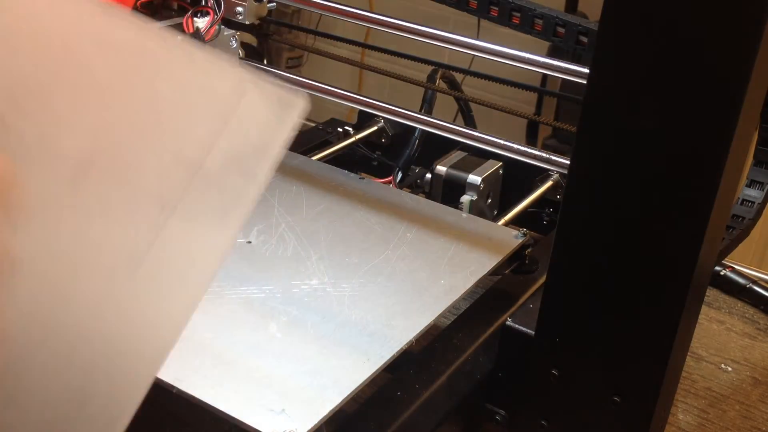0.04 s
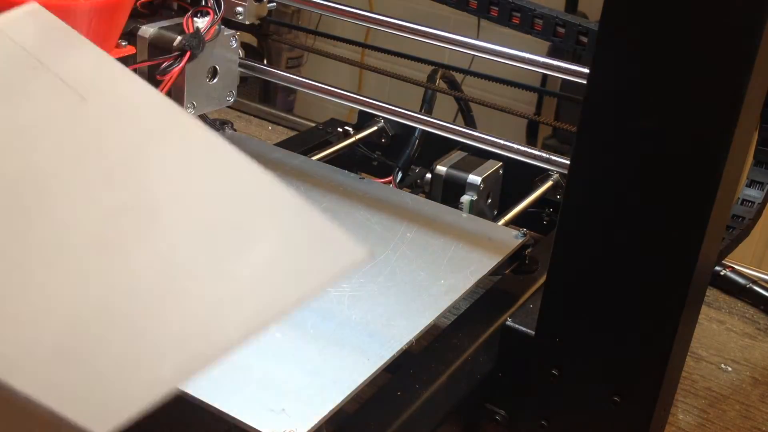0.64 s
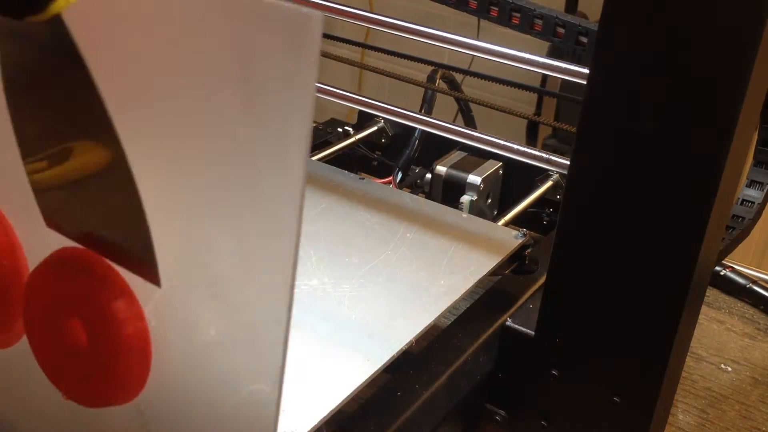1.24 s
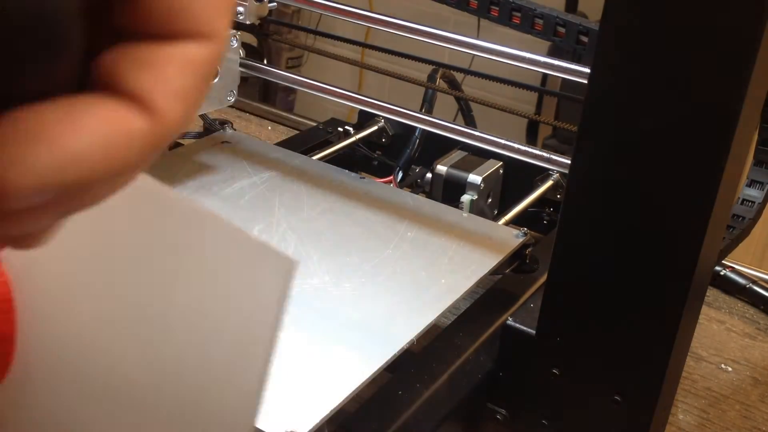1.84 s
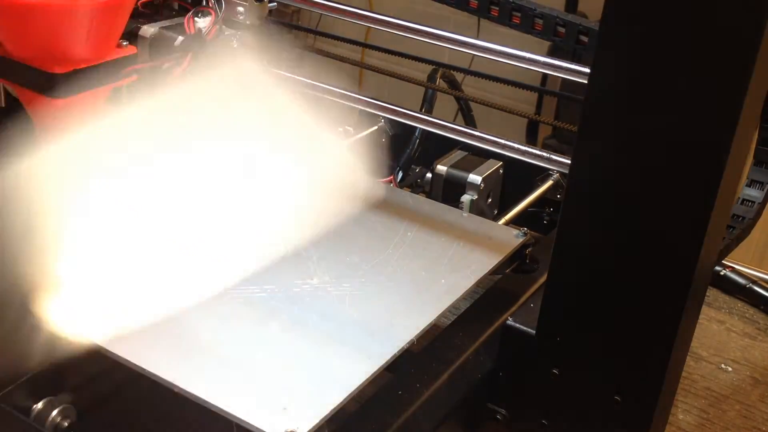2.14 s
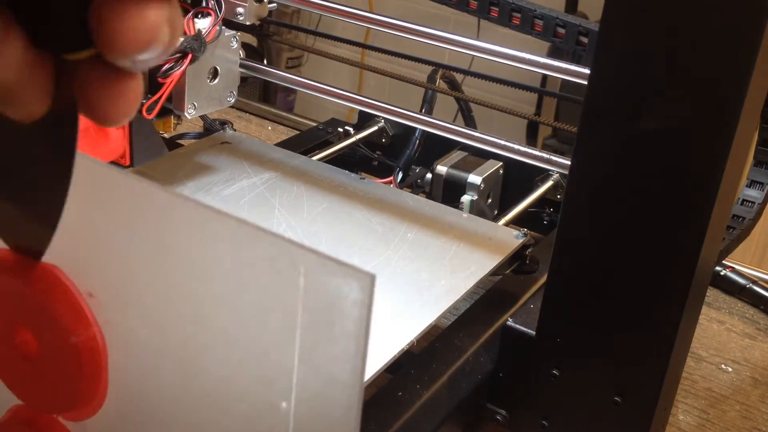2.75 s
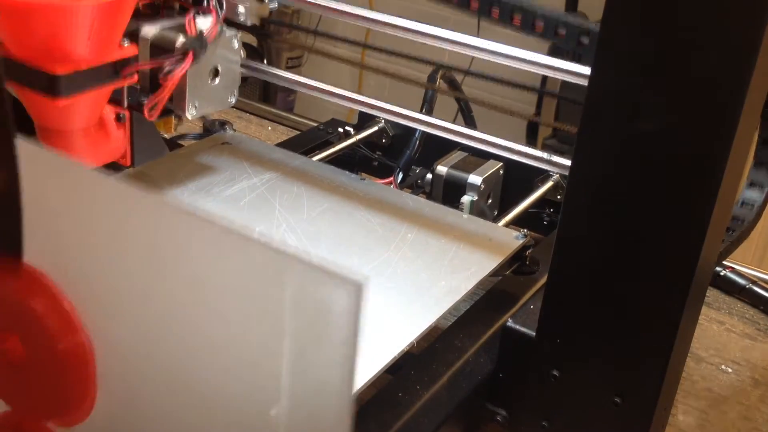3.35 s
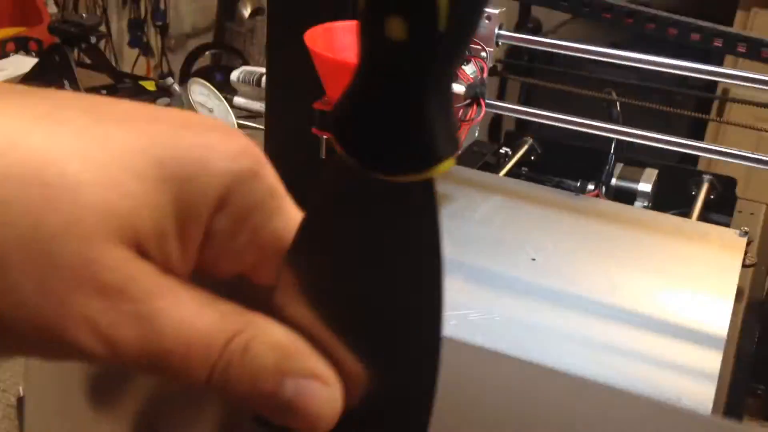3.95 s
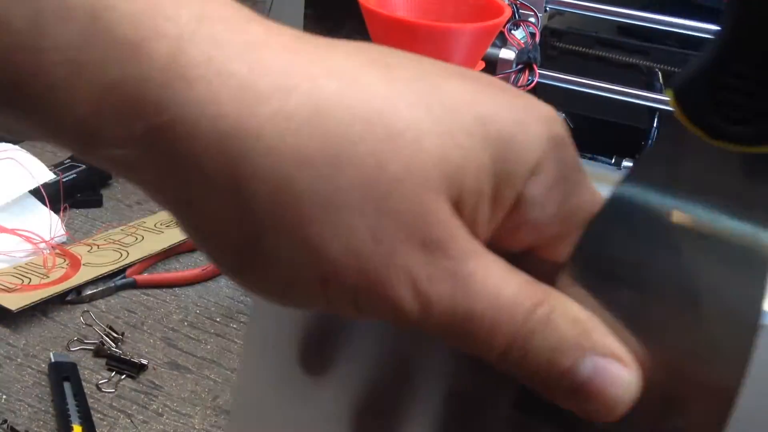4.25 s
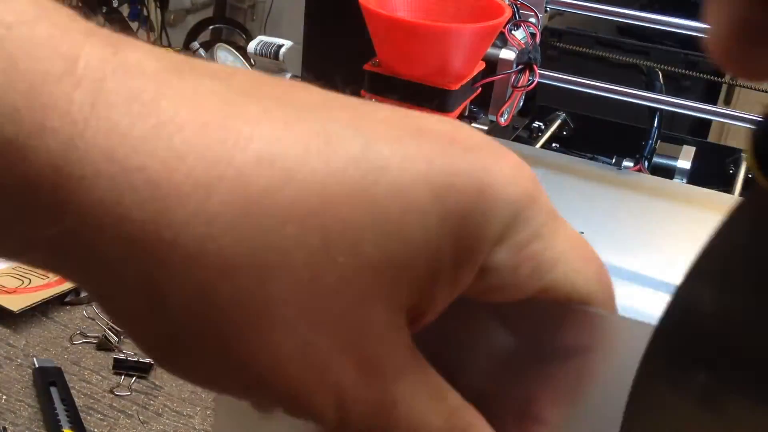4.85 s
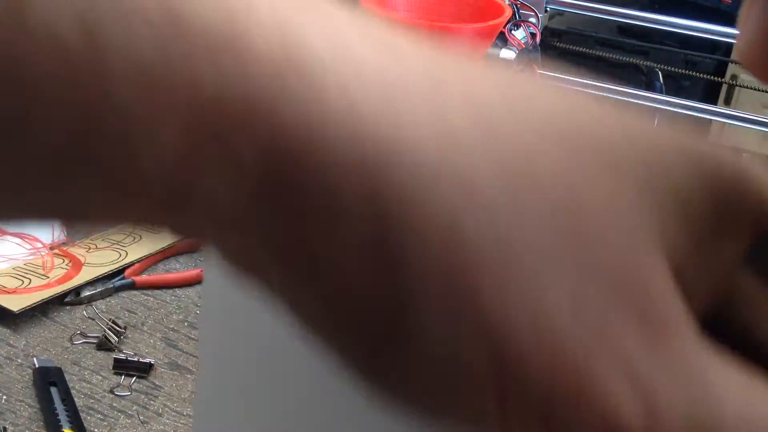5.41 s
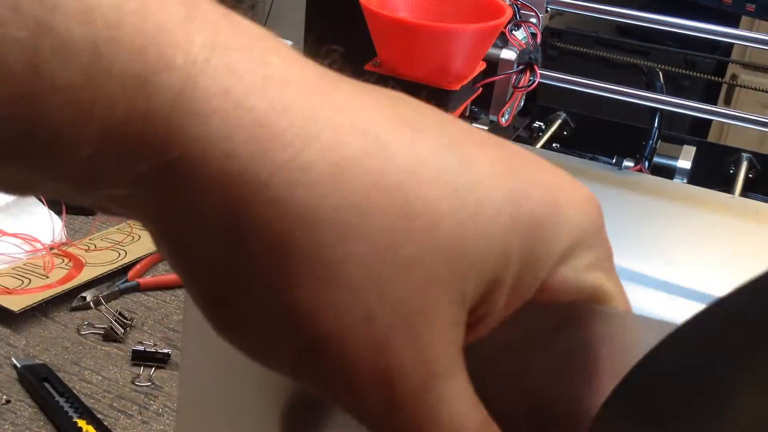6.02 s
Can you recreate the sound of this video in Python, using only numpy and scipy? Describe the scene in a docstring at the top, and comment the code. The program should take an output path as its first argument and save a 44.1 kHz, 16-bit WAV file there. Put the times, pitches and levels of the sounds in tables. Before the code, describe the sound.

An idling 3D printer's fans hiss quietly throughout, with a thin high whine, in a small room. Close up, a stiff plastic sheet is handled, with a faint tick at the start and light taps around 1 second. At about 1.5 seconds it clacks sharply three times against a steel scraper. Smaller taps and dry crackles follow, then a loud cluster of clacks near 2.5 seconds, a few ticks at 3.1 and another sharp double clack at 3.4. Around 4 seconds the fan hiss changes colour slightly, amid soft dull knocks and faint finger rubbing. From 4.5 to 4.7 seconds a printed piece stuck to the flexing sheet lets go in a quick run of about six bright, briefly ringing snaps. Light crackling and rubbing follow, then a second run of five snaps from 5.5 to 5.75 seconds, and one weaker snap just before 6.

```python
"""A stiff plastic build sheet with a print stuck to it is handled and flexed beside an idling 3D printer.
The sheet rings as it taps and clacks against a steel scraper, fingers rub it, and the bond crackles.
Twice the print lets go, sticking and slipping in a run of snaps that ring the bent sheet.
The printer's fans hiss and whine throughout; their colour shifts as the perspective swings
from the printer's front to its side."""
import sys
import numpy as np
from scipy import signal
from scipy.fft import rfft, irfft, next_fast_len
from scipy.io import wavfile
from scipy.ndimage import uniform_filter1d, map_coordinates

SR = 44100
rng = np.random.default_rng(int(sys.argv[2]) if len(sys.argv) > 2 else 0)


def wav_record(signal):
    """Record a signal, one row per channel, as 16-bit PCM in the file named by sys.argv[1]."""
    frames = np.transpose(np.atleast_2d(signal))
    bounded = np.clip(frames, -1, 1)
    # unit amplitude maps onto the largest positive 16-bit level
    quanta = np.round(bounded * 32767).astype(np.int16)
    wavfile.write(sys.argv[1], SR, quanta)


N = 267992
TIME = np.arange(N) / SR
HIT_SIZE = 4096  # samples in one hit
HIT_T = np.arange(HIT_SIZE) / SR
HIT_HZ = np.fft.rfftfreq(HIT_SIZE, 1 / SR)
TILT_OCTAVES = np.log2(np.clip(HIT_HZ, 500, 6000) / 2000)  # hardness tilts a hit around 2 kHz

# Resonances of the free sheet. Each row: frequency in Hz, width in Hz, relative strength in dB.
SHEET_MODES = [(1380, 167, -2), (1545, 73, -3), (2024, 270, -1), (2380, 170, -12), (2756, 90, -4.5),
               (3420, 790, -2), (4080, 140, -8), (4680, 100, -5)]
# EQ curve of a light touch on the sheet. Each row: frequency in Hz, gain in dB.
TOUCH_EQ = [(150, -47.5), (500, -38.5), (750, -20.5), (1050, -5.5), (1400, -3), (2100, 0.5), (3500, -10),
            (5500, -16.5), (9000, -27), (15500, -34)]


def amp(db):
    """Decibels to gain."""
    return 10 ** (np.asarray(db) / 20)


def unit(x):
    """Scale to rms 1."""
    return x / np.sqrt(np.mean(x ** 2) + 1e-20)


def along(points, hz):
    """Read a curve of (Hz, value) points on a log frequency axis."""
    point_hz, values = np.transpose(points)
    return np.interp(np.log(hz + 1), np.log(point_hz + 1), values)


def wobble(rate):
    """A smooth random curve with rate knots a second."""
    grid_s = np.linspace(0, N / SR, 1500)
    knots = rng.standard_normal(int(N * rate / SR) + 4)
    return np.interp(TIME, grid_s, map_coordinates(knots, [grid_s * rate]))


def filtered(x, response):
    """Shape a track with a gain given as a function of Hz."""
    size = next_fast_len(N + SR // 2)
    return irfft(rfft(x, size) * response(np.fft.rfftfreq(size, 1 / SR)), size)[:N]


def band(x, kind):
    """The body ("low") or the treble ("high") of a sound, split at 5.5 kHz."""
    return signal.sosfilt(signal.butter(5, 5500, kind, fs=SR, output="sos"), x)


def fade(t60):
    """Exponential decay of a hit, 60 dB down after t60 seconds."""
    return np.exp(-np.log(1000) * HIT_T / t60)


def coloured(x, eq_db):
    """Minimum-phase EQ for a hit, so that the ringing follows the attack."""
    cepstrum = irfft(np.log(amp(np.maximum(eq_db, eq_db.max() - 70))))
    cepstrum[1:HIT_SIZE // 2] *= 2
    cepstrum[HIT_SIZE // 2 + 1:] = 0
    return irfft(rfft(x) * np.exp(rfft(cepstrum)))


def ridges(modes):
    """Resonant peaks over frequency, from 0 to 1."""
    height = sum(amp(db / 2) / (1 + (2 * (HIT_HZ - hz) / width) ** 2) for hz, width, db in modes)
    return height / height.max()


def at_level(x, db):
    """Scale a hit so that its loudest 3 ms have this level."""
    return x * amp(db) / np.sqrt(uniform_filter1d(x ** 2, int(.003 * SR)).max() + 1e-20)


def balanced(x, body_db, treble_db):
    """Set the body and the treble of a hit to their own levels."""
    return at_level(band(x, "low"), body_db) + at_level(band(x, "high"), treble_db)


def add(track, start_s, x):
    """Mix x into the track at start_s."""
    start = int(np.clip(round(start_s * SR), 0, N - 1))
    track[start:start + len(x)] += x[:N - start]


def room(x):
    """Reverb of a small room: the mids linger, the treble dies quickly."""
    # Room decay. Each row: frequency in Hz, t60 in seconds.
    decay_times = [(200, .1), (1300, 0.47), (4000, 0.054), (14000, 0.11)]
    hz, t, noise = signal.stft(rng.standard_normal(SR // 3), SR, nperseg=256)
    decay = amp(-60 * t / along(decay_times, hz)[:, None])
    tail = signal.istft(noise * decay, SR, nperseg=256)[1]
    predelayed = np.pad(tail, (300, 0))
    return signal.fftconvolve(x, predelayed / np.linalg.norm(tail))[:N]


def swing(front, side, start_s=3.78, length_s=0.42):
    """Glide a value as the perspective swings from the printer's front to its side."""
    return front + (side - front) * np.clip((TIME - start_s) / length_s, 0, 1)


def fan_air(eq, duct_modes, boost_db):
    """Air noise, coloured by the narrow resonances of ducts and frame."""
    gain = amp(along(eq, HIT_HZ) + boost_db * ridges(duct_modes))
    return unit(filtered(rng.standard_normal(N), lambda hz: np.interp(hz, HIT_HZ, gain)))


def fan_tones(lines, drift, flutter_db):
    """Tones that wander together with the fan speed."""
    drifting_s = np.cumsum(1 + drift * wobble(4)) / SR
    flutter = amp(flutter_db * wobble(16))
    return np.sqrt(2) * flutter * sum(amp(db) * np.sin(2 * np.pi * hz * drifting_s) for hz, db in lines)


def fan_whine():
    """The small fan holds one thin, almost pure tone above the noise."""
    level_db = swing(-55, -53.5) + 0.98 * wobble(10)
    pitch_hz = 5178 + 2.25 * wobble(6.6)
    return np.sqrt(2) * amp(level_db) * np.sin(2 * np.pi * np.cumsum(pitch_hz) / SR)


def fans():
    """The fan bed, heard from the front, then from the side; its noise dips briefly near the end."""
    # EQ curves of the moving air. Each row: frequency in Hz, gain in dB.
    front_eq = [(25, -34), (450, -34), (650, -28.5), (850, -20), (1300, -9.5), (1750, -10), (2700, -5.5),
                (3700, -1), (5300, -0.5), (6400, -6.5), (8300, -8.5), (9500, -15), (11600, -11.5),
                (15600, -19.5)]
    side_eq = [(25, -38), (450, -31), (650, -26.5), (850, -31.5), (1300, -8), (1750, -10), (2700, -2.5),
               (3700, -5), (5300, 0.5), (6400, -9), (8300, -9.5), (9500, -14.5), (11600, -14), (15600, -19)]
    # Duct resonances. Each row: frequency in Hz, width in Hz, relative strength in dB.
    front_duct = [(1450, 42, -0.5), (2354, 80, -6.5), (2750, 56, 0), (3670, 310, -0.5), (4540, 210, -13),
                  (5750, 120, -5), (7530, 140, -14), (8510, 210, -6)]
    side_duct = [(1170, 68, 2), (1830, 64, -7), (2180, 56, 1), (2793, 34, 8), (3830, 200, 5),
                 (5120, 94, -6), (7000, 90, 2.5)]
    # Fan tones. Each row: frequency in Hz, rms level in dB before the crossfade.
    front_tones = [(790, -88.5), (920, -70), (938, -75.5), (1443, -72.5), (2304, -68), (2765, -67),
                   (4603, -75.5), (6740, -84), (8323, -70.5)]
    side_tones = [(790, -88.5), (921, -76), (1190, -77), (1916, -68.5), (2762, -80), (3830, -74.5),
                  (6735, -65.5), (8296, -85)]
    side_share = swing(0, 0.8)
    front, side = np.sqrt(1 - side_share), np.sqrt(side_share)  # equal-power crossfade
    air = front * fan_air(front_eq, front_duct, boost_db=6.0)
    air += side * fan_air(side_eq, side_duct, boost_db=11.5)
    dip_s, fall_s, recover_s = 5.8, 0.087, 0.098
    dip = np.exp(-np.maximum((dip_s - TIME) / fall_s, (TIME - dip_s) / recover_s))
    rush = amp(swing(-51.5, -52.5) - 3 * dip) * unit(band(air, "low"))
    hiss = amp(swing(-54.5, -57.5) - 5 * dip) * unit(band(air, "high"))
    hum = front * fan_tones(front_tones, drift=0.0004, flutter_db=0.5)
    hum += side * fan_tones(side_tones, drift=0.00047, flutter_db=0.0)
    return rush + hiss + hum + fan_whine()


def strike(t60, direct):
    """A direct impulse, then bending waves that scatter around the sheet and die."""
    waves = rng.standard_normal(HIT_SIZE) * fade(t60)
    waves[0] += direct
    return waves


def thud(db, t60):
    """The low push of a contact."""
    lowpass = signal.butter(2, 550, fs=SR, output="sos")
    return at_level(signal.sosfilt(lowpass, strike(t60, direct=15.4)), db)


def grip_db():
    """Envelope of the fingers' work in dB: each shift of grip swells, holds and fades."""
    # Shifts of grip. Each row: start in seconds, length in seconds, level in dB.
    grips = [(1.01, .06, -52), (1.5, 0.25, -67), (2.412, 0.062, -67), (3.42, .04, -59), (4.057, 0.076, -51),
             (4.258, 0.059, -51.5), (4.787, 0.19, -59.5), (5.126, 0.024, -53), (5.35, .12, -57),
             (5.97, .1, -68)]
    attack_s, release_s = 0.043, 0.033
    gain = amp(-74)  # fingers at rest
    for start, length, db in grips:
        before = np.maximum(start - TIME, 0)
        after = np.maximum(TIME - start - length, 0)
        gain = np.maximum(gain, amp(db) * np.exp(-before / attack_s - after / release_s))
    return 20 * np.log10(gain)


def rubbing(grains_per_s=900):
    """Fingers creep over the sheet in dense tiny grains, with a light rustle on top."""
    grains = (rng.random(N) < grains_per_s / SR) * rng.standard_normal(N) * amp(3 * wobble(40))
    touch = coloured(strike(t60=0.048, direct=9.9), along(TOUCH_EQ, HIT_HZ))
    body = unit(signal.fftconvolve(grains, touch)[:N])
    scuffs = signal.fftconvolve(grains, strike(t60=0.004, direct=3.7))[:N]
    rustle = unit(band(scuffs, "high"))
    return amp(grip_db()) * (amp(-3.5) * body + amp(-4) * rustle)


def cracks():
    """Small patches of the bond break with dry, bright ticks; a fainter crackle follows the grip."""
    # Cracks of sheet and bond. Each row: start in seconds, body in dB, treble in dB.
    sharp_cracks = [(0.0911, -38, -32.5), (1.1358, -38.5, -37), (1.148, -41, -41), (1.274, -36, -38.5),
                    (1.832, -34, -36.5), (1.867, -30, -40), (1.933, -39.5, -42.5), (2.223, -39, -37.5),
                    (2.388, -35, -34), (2.528, -15.5, -23), (3.103, -30.5, -27), (3.112, -31.5, -32.5),
                    (3.118, -31, -38), (3.144, -34, -39), (4.116, -40, -39), (4.197, -38, -42),
                    (4.5363, -29.5, -22), (4.811, -39, -39), (4.853, -39.5, -43), (4.8766, -35, -34.5),
                    (4.9235, -36.5, -44), (5.038, -37, -52), (5.269, -45, -44), (5.489, -46, -45)]
    # EQ curve of a crack. Each row: frequency in Hz, gain in dB.
    crack_eq = [(30, -34), (500, -30.5), (1000, -10), (2000, -0.5), (4500, 1.5), (8000, -6.5),
                (15500, -10.5)]
    crackle_per_s, above_grip_db, spread_db = 17, 7.5, 3
    count = int(crackle_per_s * N / SR)
    time_draw, level_draw = rng.random((count, 2)).T
    times = (np.arange(count) + time_draw) / crackle_per_s
    levels = np.interp(times, TIME, grip_db()) + above_grip_db + spread_db * (2 * level_draw - 1)
    colour = along(crack_eq, HIT_HZ)
    out = np.zeros(N)
    for start, body_db, treble_db in [*sharp_cracks, *zip(times, levels, levels)]:
        tick = coloured(strike(t60=0.023, direct=8.1), colour)
        add(out, start, balanced(tick, body_db, treble_db))
    return out


def taps():
    """Contacts wake the sheet's damped resonances; the softer the touch, the duller the knock."""
    # Taps on the sheet. Each row: start in seconds, body in dB, hardness as tilt in dB per octave.
    hits = [(0.0909, -37.5, -9), (0.963, -37.5, -6.5), (1.0047, -32.5, 0), (1.035, -40, -4),
            (1.05, -33, -4.5), (1.197, -22.5, 1), (1.288, -29.5, 0.5), (1.69, -38.5, 4), (1.778, -30, -5),
            (1.87, -31.5, -1), (1.875, -25, 13), (2.409, -27.5, 4.5), (2.431, -33, 6), (2.474, -33, 5),
            (2.5044, -18.5, 4), (2.5141, -14.5, 5), (3.364, -34, -6), (3.586, -40.5, -6),
            (3.763, -42, -11.5), (3.824, -39.5, -5), (3.965, -42.5, -13), (4.026, -40.5, -11.5),
            (4.06, -41, -4), (4.092, -31.5, 1.5), (4.298, -42.5, -2), (4.452, -41.5, -2.5),
            (5.13, -37, 9.5), (5.391, -38.5, 4), (5.454, -37.5, 4)]
    colour = along(TOUCH_EQ, HIT_HZ) + 11 * ridges(SHEET_MODES)
    out = np.zeros(N)
    for start, body_db, tilt in hits:
        knock = coloured(strike(t60=0.033, direct=11.9), colour + tilt * TILT_OCTAVES)
        treble_db = max(body_db - 14, -46)  # even a soft touch scuffs
        add(out, start, balanced(knock, body_db, treble_db))
    return out


def clacks():
    """Sheet meets scraper: it knocks, its edge buzzes a moment later, and it rebounds four times."""
    # Hard contacts. Each row: start in seconds, body, treble and thud in dB, hardness as tilt in
    # dB per octave, ring t60 in seconds, first rebound in dB against the body.
    hits = [(1.4747, -15.5, -24.5, -60, -2.5, 0.029, -25), (1.5241, -22, -34.5, -58, 1, 0.054, -13),
            (1.569, -14.5, -21.5, -47.5, .5, 0.043, -12), (2.191, -31.5, -35.5, -64, 0, 0.05, -25),
            (2.4045, -21, -35, -55, -1, .023, -20), (2.5111, -12, -27.5, -69, 5.5, 0.019, -31),
            (3.344, -25, -37, -70, -2, 0.036, -17), (3.3902, -13.5, -17.5, -41.5, 0, 0.047, -8.5)]
    # EQ curve of a clack. Each row: frequency in Hz, gain in dB.
    clack_eq = [(150, -69.5), (450, -35), (700, -13.5), (1100, -3.5), (1350, -2), (1780, -5.5), (2100, -2),
                (4500, -7.5), (6500, -17), (9500, -20.5), (15500, -23.5)]
    buzz_lag_s, rebound_gap_s, rebound_loss_db = 0.00129, 0.0102, 5.3
    sheet_colour = along(clack_eq, HIT_HZ) + 9.8 * ridges(SHEET_MODES)
    out = np.zeros(N)
    for start, body_db, treble_db, thud_db, tilt, t60, rebound_db in hits:
        colour = sheet_colour + tilt * TILT_OCTAVES
        knock = band(coloured(strike(t60, direct=7.9), colour), "low")
        add(out, start, at_level(knock, body_db) + thud(thud_db, t60=0.027))
        buzz = band(coloured(strike(t60, direct=0.69), colour), "high")
        add(out, start + buzz_lag_s, at_level(buzz, treble_db))
        for k in range(4):
            rebound = band(coloured(strike(t60=0.034, direct=7.6), colour), "low")
            level_db = body_db + rebound_db - rebound_loss_db * k
            add(out, start + (k + 1) * rebound_gap_s, at_level(rebound, level_db))
    return out


def after_ring():
    """A few lightly damped modes of the steel scraper blade ring on after a snap."""
    # Ringing modes. Each row: frequency in Hz, level in dB against the snap's body, t60 in seconds.
    modes = [(1200, -28, 0.21), (1590, -58, 0.13), (1990, -32, 0.032), (2660, -23, 0.049)]
    t = np.arange(SR // 4) / SR
    return sum(amp(db - 60 * t / t60) * np.sin(2 * np.pi * hz * t) for hz, db, t60 in modes)


def slips():
    """The print lets go: each slip tears for a moment, snaps, and rings the bent sheet's dense modes."""
    # Slips of the print. Each row: start in seconds, body, treble and thud in dB, rise in seconds.
    releases = [(4.4954, -26, -31.5, -79, 0.0037), (4.537, -27.5, -39, -48.5, 0.0011),
                (4.574, -20, -27, -71, 0.0021), (4.612, -16.5, -21, -66, 0.0024),
                (4.6494, -15, -21, -32, .002), (4.6858, -24, -28, -73, .0015),
                (5.542, -19.5, -26.5, -72, 0.00176), (5.588, -16.5, -22, -41, 0.0019),
                (5.635, -16, -21, -56, .001), (5.682, -18, -23.5, -44.5, 0.0012),
                (5.733, -18, -23.5, -40.5, 0.0015), (5.9456, -26.5, -37, -88, .002)]
    # EQ curve of a slip. Each row: frequency in Hz, gain in dB.
    slip_eq = [(150, -47), (500, -27), (1000, -15.5), (1200, -7), (1450, -2), (1760, -5.5), (2000, -2),
               (3000, -3.5), (4200, -14), (7000, -6), (9000, -14), (12000, -12.5), (15500, -18)]
    # Resonances of the bent sheet. Each row: frequency in Hz, width in Hz, relative strength in dB.
    bent_modes = [(1198, 69, -2), (1540, 60, -4), (1903, 230, -10), (2470, 130, -28), (3210, 120, -4),
                  (3430, 50, -32), (4070, 84, 10), (4500, 520, 4), (5200, 190, -24), (5200, 110, -19),
                  (7250, 430, -31), (8300, 130, -3)]
    colour = along(slip_eq, HIT_HZ) + 13.6 * ridges(bent_modes)
    shared_waves = rng.standard_normal(HIT_SIZE)  # every slip rings the same sheet
    out = np.zeros(N)
    for start, body_db, treble_db, thud_db, rise_s in releases:
        waves = unit(0.88 * shared_waves + rng.standard_normal(HIT_SIZE))
        tear = waves * fade(t60=0.043) * (1 - np.exp(-HIT_T / rise_s))
        tear[int(rise_s * SR)] += 3.5  # the snap
        add(out, start, balanced(coloured(tear, colour), body_db, treble_db))
        add(out, start + rise_s, thud(thud_db, t60=0.016))
        add(out, start + rise_s, amp(body_db) * after_ring())
    return out


def scene():
    """The sheet up close with a touch of room, the fans behind it, in mono."""
    sheet = taps() + clacks() + cracks() + slips() + rubbing()
    return (sheet + amp(-28.5) * room(sheet) + fans())[None]


def record(dry):
    """A steep low-pass takes off the very top."""
    cutoff_hz = 15950
    return filtered(dry[0], lambda hz: 1 / np.sqrt(1 + (hz / cutoff_hz) ** 200))[None]


dry = scene()
out = record(dry)
wav_record(out)
```